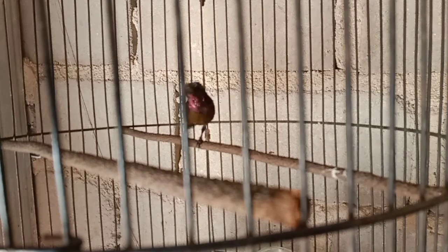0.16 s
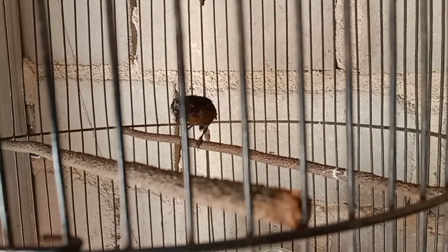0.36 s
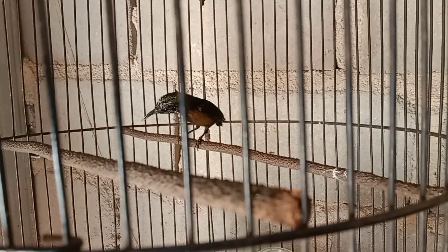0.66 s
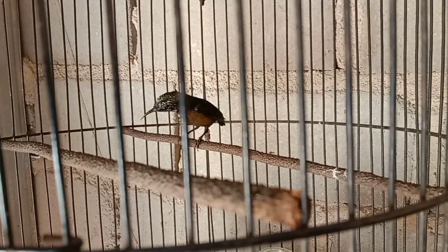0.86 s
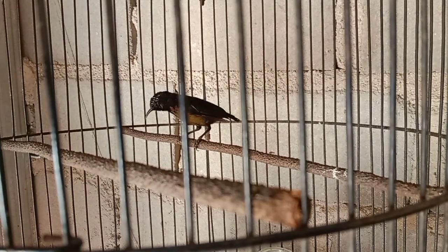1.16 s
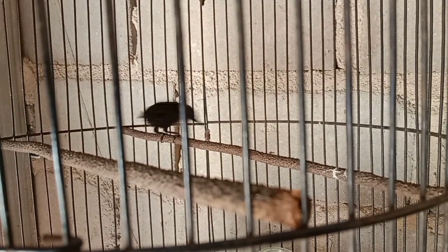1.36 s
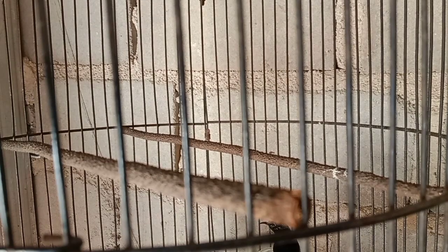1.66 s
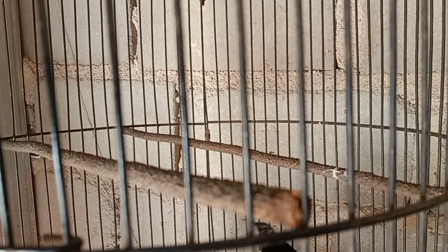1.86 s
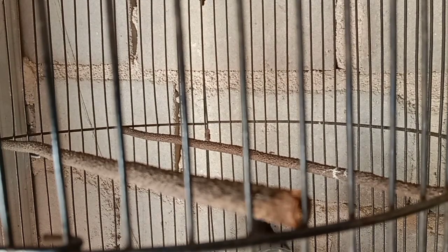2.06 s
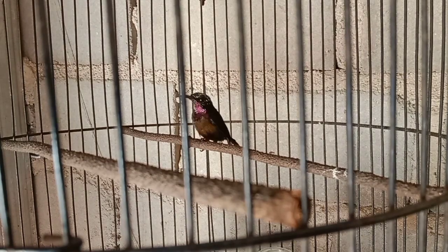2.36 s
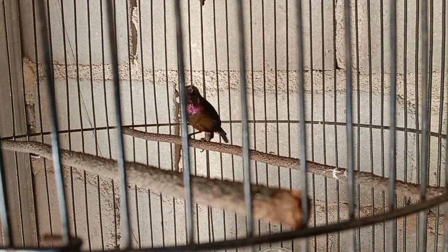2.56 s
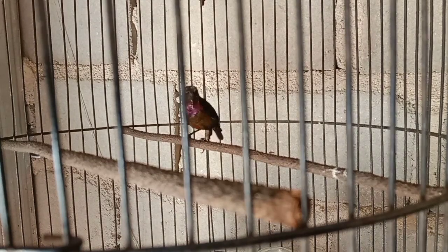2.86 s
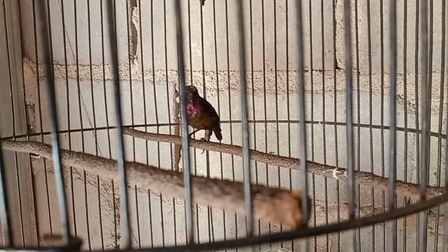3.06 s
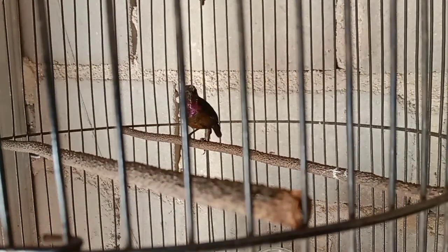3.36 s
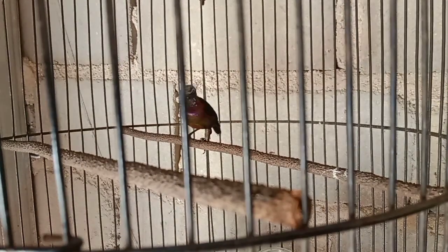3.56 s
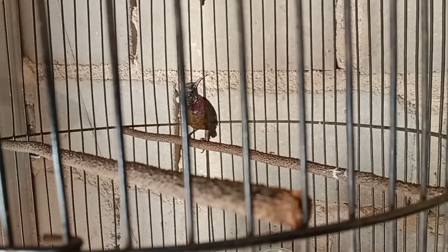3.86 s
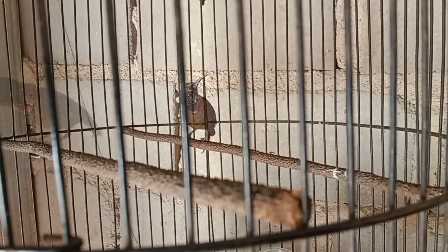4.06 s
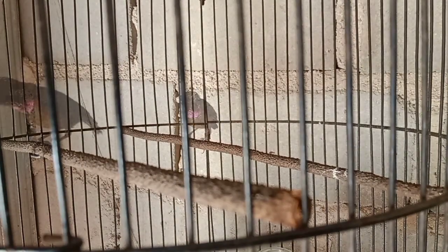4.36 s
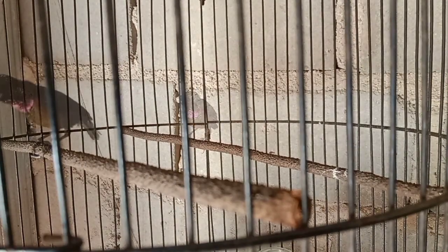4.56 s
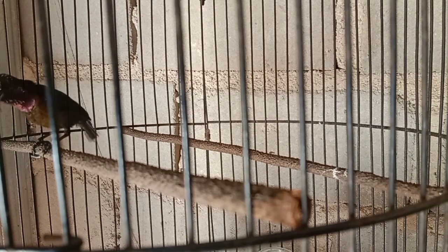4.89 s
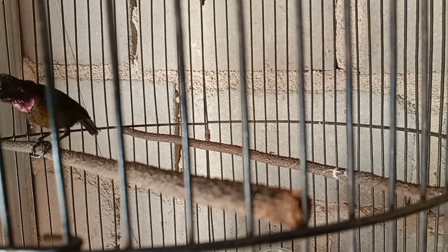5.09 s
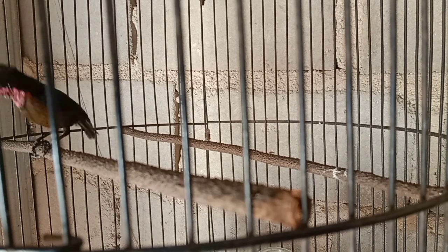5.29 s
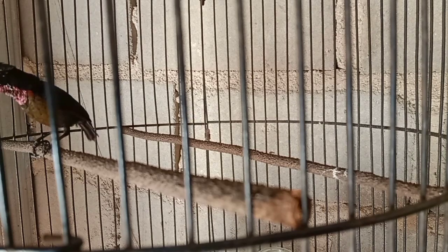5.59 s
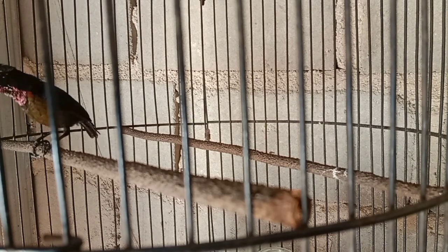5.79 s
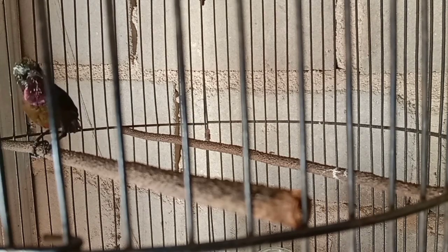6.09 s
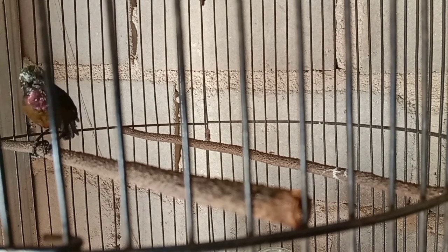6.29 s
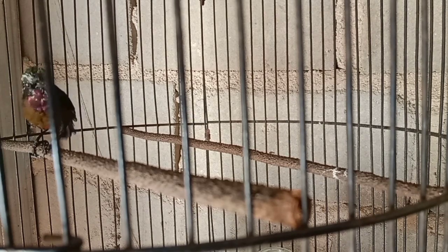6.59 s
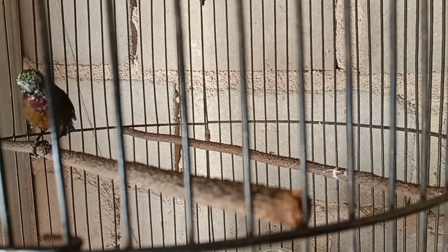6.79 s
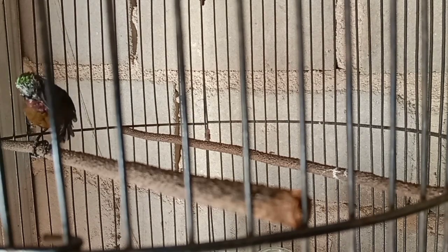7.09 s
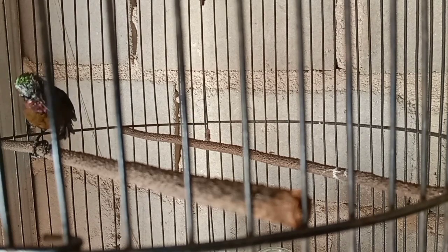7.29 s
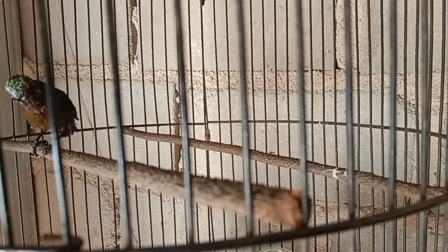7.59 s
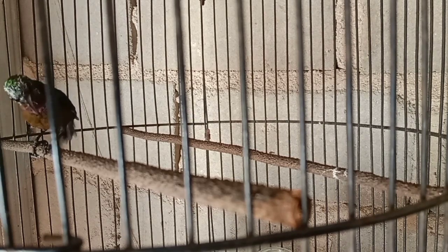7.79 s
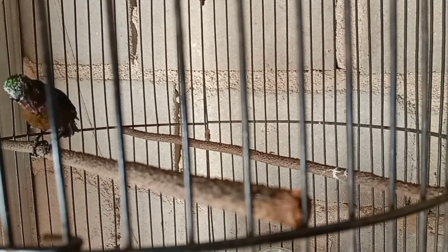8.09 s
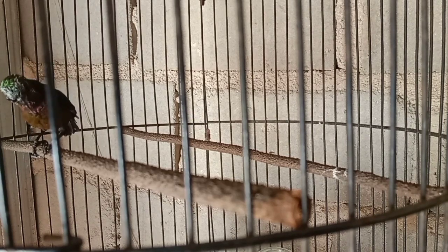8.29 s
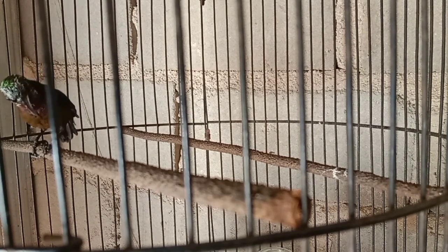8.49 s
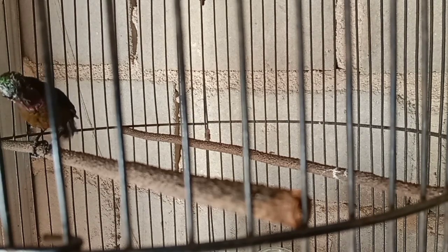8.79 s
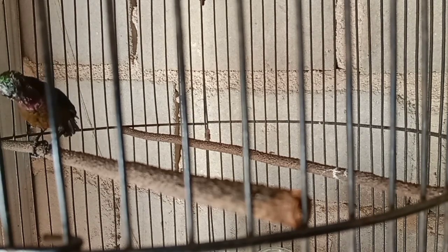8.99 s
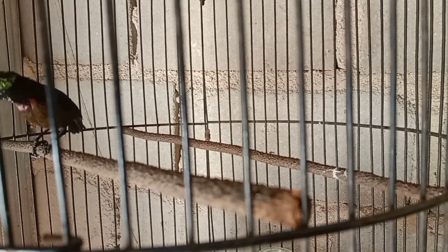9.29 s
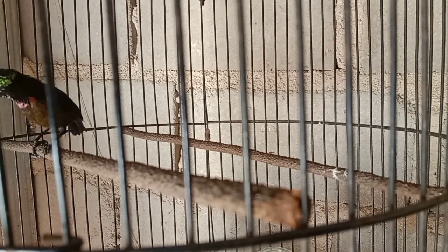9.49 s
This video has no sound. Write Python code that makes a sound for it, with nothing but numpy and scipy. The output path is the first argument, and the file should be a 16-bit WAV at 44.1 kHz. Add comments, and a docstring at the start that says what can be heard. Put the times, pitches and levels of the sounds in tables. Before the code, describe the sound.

Bright sunbird whistles and scratchy chattering burst out with short pauses, among feather flicks and soft wing thumps, above uneven low hum, roar and hiss.

```python
"""A short reedy chirp opens over a motor hum and a distant roar: a caged sunbird before a tiled wall.
Clear whistles (gliding tones with faint overtones), harsh rasps (rough harmonic voices, some overlapping)
and one fast trill (a repeated upstroke) follow, among feather flicks (grainy noise) and soft thumps.
The hum is a set of wavering harmonics in rumble; roar and hiss are patchy noise.
Roar and hiss swell, fade and twice jump back in."""
import sys
import numpy as np
from scipy import signal
from scipy.fft import rfft, irfft, next_fast_len
from scipy.io import wavfile
from scipy.ndimage import uniform_filter1d

SR = 44100
rng = np.random.default_rng(int(sys.argv[2]) if len(sys.argv) > 2 else 0)


def dump(signal):
    """Clip the signal to [-1, 1] and save it as 16-bit WAV at the path in sys.argv[1]."""
    limited = np.clip(np.atleast_2d(signal).T, -1, 1)
    pcm = np.round(limited * 32767).astype(np.int16)
    wavfile.write(sys.argv[1], SR, pcm)


N = 425565
TIME = np.arange(N) / SR


def gain_of(db):
    """Logarithmic level: converts decibels to amplitude."""
    return 10 ** (np.asarray(db) / 20)


def evened(x):
    """Power normalisation: scales a signal to rms 1."""
    return x / np.sqrt(np.mean(x ** 2) + 1e-20)


def read(points, hz):
    """Spectral envelope: levels in dB, joined on a log-frequency axis."""
    f, db = np.transpose(points)
    return np.interp(np.log(hz + 1), np.log(f + 1), db)


def curves(rows, t):
    """Piecewise-linear envelopes: every column of a time table at the times t."""
    s, *columns = np.transpose(rows)
    return [np.interp(t, s, c) for c in columns]


def add(mix, s, sound):
    """Superposition: mixes a sound in at time s."""
    part = mix[max(round(s * SR), 0):][:len(sound)]
    part += sound[:len(part)]


def noise(colour, size):
    """Spectral shaping: white noise filtered to a given spectrum, rms 1."""
    hz = np.fft.rfftfreq(size, 1 / SR)
    spectrum = rfft(rng.standard_normal(size)) * gain_of(read(colour, hz))
    return evened(irfft(spectrum, size))


def wander(rate_hz, size):
    """Low-pass random modulation: smooth chance up to a rate, about rms 1."""
    length = next_fast_len(size + 4096)
    hz = np.fft.rfftfreq(length, 1 / SR)
    spectrum = rfft(rng.standard_normal(length)) / (1 + (hz / rate_hz) ** 4)
    return evened(irfft(spectrum, length))[:size]


def patchy(colour, patch_db, size=14):
    """Nonstationary noise: narrow bands swell and fade on their own."""
    hz, _, z = signal.stft(rng.standard_normal(N), SR, nperseg=2048, noverlap=1536)
    # size counts the time frames averaged: larger patches change more slowly
    patches = uniform_filter1d(rng.standard_normal(z.shape), size=4, axis=0)
    patches = uniform_filter1d(patches, size=size, axis=1)
    z = z * gain_of(read(colour, hz)[:, None] + patch_db * evened(patches))
    return evened(signal.istft(z, SR, nperseg=2048, noverlap=1536)[1][:N])


def hum(lines_db=-1, rumble_db=-4, waver=.008):
    """Rotating machinery: harmonics of a wavering turning rate, in low rumble."""
    # motor speed: (time [s], mean rate [turns/s])
    motor_speed = [(1.8, 46), (4.4, 49.1)]
    # harmonics: (multiple of the turning rate, relative level [dB])
    hum_lines = [(2, -4), (3, 0), (4, -17.5), (5, -9.5)]
    # rumble spectrum: (frequency [Hz], relative level [dB])
    rumble_colour = [(40, -32), (75, -10), (115, -2.5), (170, -1), (250, -14.5), (330, -21), (600, -51)]
    # common envelope of lines and rumble, which sinks away in the lull: (time [s], gain [dB])
    hum_level = [(0, -48.5), (.2, -56), (.27, -41.5), (1.24, -44.5), (1.32, -58), (1.43, -44), (1.8, -41.5),
                 (2.05, -47), (2.28, -71), (4.471, -83), (4.475, -41.5), (5.4, -45), (7.8, -44.5),
                 (8.4, -41.5), (9.65, -43)]
    turns = np.cumsum(curves(motor_speed, TIME)[0] * (1 + waver * wander(7.4, N))) / SR
    lines = sum(gain_of(db + 2 * wander(5, N)) * np.sin(2 * np.pi * k * turns) for k, db in hum_lines)
    rumble = patchy(rumble_colour, patch_db=3.0)
    mixture = gain_of(lines_db) * evened(lines) + gain_of(rumble_db) * rumble
    return gain_of(curves(hum_level, TIME)[0]) * mixture


def whines():
    """Narrow-band noise: slow random amplitudes on steady tones, entering as the hum returns."""
    # faint whines: (frequency [Hz], rms level before the dips [dB])
    whine_lines = [(1567, -76.5), (3898, -78.5), (4334, -81.5)]
    from_s, width_hz = 4.472, 30
    tones = sum(gain_of(db) * evened(wander(width_hz, N) * np.sin(2 * np.pi * hz * TIME))
                for hz, db in whine_lines)
    return tones * (TIME > from_s)


def roar(flutter_db=1.07):
    """Band-wise envelopes: coloured noise jumps in, flutters and fades in three bands."""
    # spectra before and after the change of colour: (frequency [Hz], relative level [dB])
    early_colour = [(140, -32), (230, -5), (315, -6), (423, 0.5), (634, -10), (695, -18.5), (810, -1),
                    (930, -3), (1020, -15), (1280, -10.5), (1470, -20), (1650, -9.5), (1840, -29.5),
                    (2100, -25.5), (2400, -45.5), (3000, -70.5)]
    late_colour = [(140, -23.5), (230, -4), (300, -3.5), (400, -0.5), (600, -6.5), (700, -14.5), (1000, -2),
                   (1170, -7), (1350, -4), (1500, -10.5), (1670, -10.5), (1850, -20), (2100, -23.5),
                   (2400, -41), (3000, -58.5)]
    # low, middle and upper band: (lower edge [Hz], upper edge [Hz])
    band_edges = [(150, 673), (720, 1395), (1480, 4000)]
    # band envelopes: (time [s], low gain [dB], middle gain [dB], upper gain [dB])
    band_levels = [(0, -40, -34.5, -44), (.85, -44.5, -45.5, -64), (1.754, -51.5, -59, -87),
                   (1.758, -41.5, -49, -52.5), (2.05, -48, -56, -54.5), (2.2, -62, -61, -70),
                   (2.6, -57.5, -70, -71.5), (3.2, -69.5, -80.5, -78), (4.471, -76, -91, -82),
                   (4.473, -34.5, -36.5, -48.5), (5.0, -40.5, -37, -48), (5.35, -45, -46, -48.5),
                   (6.0, -47, -50.5, -64), (6.4, -46, -49.5, -58), (7.15, -57, -60, -69),
                   (8.2, -62, -70, -82.5), (8.4, -60, -63.5, -75), (8.799, -67, -75, -82.5),
                   (9.65, -67.5, -74.5, -85.5)]
    change_s = 1.757
    sound = np.where(TIME < change_s, patchy(early_colour, patch_db=3), patchy(late_colour, patch_db=4.5))
    roaring = 0
    for edges, db in zip(band_edges, curves(band_levels, TIME)):
        band_pass = signal.butter(4, edges, "bandpass", fs=SR, output="sos")
        roaring = roaring + gain_of(db) * evened(signal.sosfiltfilt(band_pass, sound))
    return roaring * gain_of(flutter_db * wander(11, N))


def hiss(grain_db=1.5):
    """Amplitude-modulated noise: broad hiss swells over a faint floor, beside a thin sizzle."""
    # swells: (time [s], rise [s], hold [s], peak gain [dB], fade [dB/s])
    swells = [(1.755, 0.0025, 0.27, -48, 53), (2.445, 0.095, 0.086, -74.5, 60),
              (3.761, 0.0096, 0.14, -65.5, 204.5), (4.473, 0.003, 0.47, -45, 36.5),
              (6.289, 0.024, 0.053, -70, 143), (7.116, .008, 0.082, -60.5, 40),
              (8.334, 0.038, 0.12, -52, 112.5), (9.371, 0.04, 0.037, -60, 138)]
    # spectra of hiss and sizzle: (frequency [Hz], relative level [dB])
    hiss_colour = [(500, -30), (1400, -1.5), (4500, -4), (8400, -3.5), (9400, -11), (15500, -20)]
    sizzle_colour = [(3000, -29.5), (4000, -3), (5200, -39.5), (6500, -3), (7600, 8.5), (8900, -3.5),
                     (9500, -33), (15000, -39.5)]
    # weight of the air, the part of the hiss above air_hz: (time [s], gain [dB])
    air_weight = [(1.7, -11.5), (1.76, -10.5), (2.1, -3.5), (2.3, -1.5), (2.58, 5.5), (2.65, 11),
                  (4.3, 4.5), (4.5, -14.5), (5.6, -6.5), (6.2, -8), (6.32, 12), (7.6, 6), (7.9, 4),
                  (8.35, 5)]
    # mean envelope of the treble sizzle: (time [s], gain [dB])
    sizzle_level = [(0, -75), (4.47, -75), (4.48, -54), (5.3, -63), (6.4, -65.5), (7.9, -74), (8.3, -55),
                    (8.9, -64.5), (9.2, -74), (9.45, -60)]
    floor_db, air_hz = -72.5, 9200
    level = gain_of(floor_db)
    for s, rise, hold, db, fade in swells:
        fading_s = np.maximum(TIME - s - rise - hold, 0)
        level = level + np.clip((TIME - s) / rise, 0, 1) * gain_of(db - fade * fading_s)
    sound = patchy(hiss_colour, patch_db=5.0, size=9)
    body = signal.sosfiltfilt(signal.butter(8, air_hz, fs=SR, output="sos"), sound)
    air = (sound - body) * gain_of(curves(air_weight, TIME)[0])
    broad = (body + air) * level * gain_of(wander(30, N) + grain_db * wander(400, N))
    sizzle_db = curves(sizzle_level, TIME)[0] + 2 * wander(15, N)
    return broad + patchy(sizzle_colour, patch_db=3.5) * gain_of(sizzle_db)


def puff(u):
    """Impulsive envelope: a swell to its peak at u = 1/4, then exponential decay."""
    return 4 * u * np.exp(1 - 4 * u)


def thuds():
    """Low-frequency impulses: soft thumps, likely puffs of air from the wings, swell and die."""
    # thumps: (time [s], time scale, half the duration [s], centre [Hz], level [dB], width [octaves])
    thumps = [(1.735, 0.28, 178.6, -36, 0.049), (2.591, 0.15, 430, -43.5, 1.4),
              (2.796, 0.14, 252, -35, 1.2), (3.372, 0.071, 218, -53, 0.19), (3.637, 0.081, 187, -40, 0.23),
              (4.489, 0.079, 251, -28.5, 0.11), (5.98, 0.07, 350, -38.5, 0.62),
              (8.278, 0.1, 129, -37, 0.26), (8.36, 0.14, 190, -44.5, 0.84)]
    out = np.zeros(N)
    bands_hz = np.geomspace(20, 20000, num=200)
    for s, length, hz, db, width in thumps:
        u = np.arange(0, 2, 1 / (length * SR))
        resonance_db = -20 * np.log10(1 + (np.log2(bands_hz / hz) / width) ** 2)
        colour = np.transpose([bands_hz, resonance_db - (bands_hz / 1000) ** 2])
        add(out, s, gain_of(db) * noise(colour, len(u)) * puff(u))
    return out


def flicks(grain_db=3, knee_hz=6000):
    """Friction noise: feathers brush in short grainy swishes; a whole wing adds the lower part."""
    # flicks: (time [s], time scale, half the duration [s], level [dB], weight of the low swish [dB])
    swishes = [(0.252, 0.056, -55.5, -21), (0.332, 0.05, -57.5, -23), (0.414, 0.038, -54, -22),
               (0.515, 0.041, -49.5, -28), (0.617, 0.037, -48.5, -18), (2.597, 0.092, -38.5, -10.5),
               (2.804, 0.16, -48, -14), (3.807, 0.045, -53, 0), (3.837, 0.058, -46.5, -5.5),
               (3.936, 0.012, -54.5, -3), (5.993, 0.05, -61.5, -3), (6.487, 0.015, -38, -23.5),
               (7.294, 0.032, -39.5, -10), (7.311, 0.014, -30.5, -10), (7.378, 0.023, -33, -15),
               (7.397, 0.015, -35.5, -15), (7.403, 0.016, -38, -4), (7.47, 0.087, -49.5, -16)]
    # feather spectrum: (frequency [Hz], relative level before the low weight [dB])
    feather_colour = [(300, -20), (1200, 1), (2500, 7), (4500, 11.5), (7500, 4), (8800, -6), (9800, -17.5),
                      (15000, -31)]
    out = np.zeros(N)
    for s, length, db, low_db in swishes:
        u = np.arange(0, 2, 1 / (length * SR))
        colour = [(hz, level + low_db * (hz < knee_hz)) for hz, level in feather_colour]
        swish = evened(noise(colour, len(u)) * gain_of(grain_db * wander(590, len(u))))
        add(out, s, gain_of(db) * swish * puff(u))
    return out


def syrinx(hz, jitter):
    """Frequency modulation: phase of a membrane whose pitch glides and trembles."""
    pitch = uniform_filter1d(hz, size=110, mode="nearest") * (1 + jitter)
    return 2 * np.pi * np.cumsum(pitch) / SR, pitch


def gate(t, edge_s=0.0015):
    """Smooth onset and offset: the air valve opens and shuts softly."""
    edge = np.clip(np.minimum(t - t[0], t[-1] - t) / edge_s, 0, 1)
    return np.sin(np.pi / 2 * edge) ** 2


def sag(t):
    """Pressure-dependent pitch: a factor that droops as the note's air is cut off."""
    cut_s, cut_share = 0.0021, 0.054
    return 1 - cut_share * np.exp((t - t[-1]) / cut_s)


def arch(u, peak, onset_db, end_db):
    """Level envelope in dB over a note (u from 0 to 1): it swells to its peak and eases off."""
    peak = np.clip(peak, .05, .95)
    swell_db = onset_db * abs(1 - u / peak) ** 1.5
    ease_db = end_db * abs((u - peak) / (1 - peak)) ** 1.5
    return np.where(u < peak, swell_db, ease_db)


def rasps(jitter=0.12, slope_db=-7, shimmer=1.0, doubling=1.3):
    """Source and filter: chaotic vibration smears harmonics under the throat's peak near 7.5 kHz."""
    # one row a voice; the two sides of the syrinx may overlap:
    # (time [s], length [s], start pitch [Hz], end pitch [Hz], lateness of the sweep [1 = even],
    #  relative level [dB], loudest at [share of length], roughness at the start [0-1])
    sweeps = [(2.64, 0.039, 3520, 4555, 0.36, -25, 0.28, 0.29),
              (2.647, 0.028, 4900, 5740, 0.31, -23, 0.55, 0.049),
              (2.783, 0.036, 2530, 6690, 2.5, -25, 0.69, 0.41),
              (2.797, 0.033, 2800, 6500, 1.7, -19, 0.98, 0.35),
              (2.963, 0.041, 3410, 6570, 1.42, -28.5, 0.3, 0.48),
              (2.97, 0.024, 4110, 8140, 0.76, -22, 0.75, .08),
              (3.074, 0.023, 3380, 2230, 3.2, -30, .8, 0.088),
              (3.095, 0.016, 2186, 2590, 1, -27, 0.34, 0.76),
              (3.103, 0.013, 2880, 4030, 0.7, -22, .5, 0.17),
              (3.161, .013, 1985, 2710, 0.89, -26.5, 0.49, 0.87),
              (3.263, 0.022, 2350, 4340, 0.73, -24, 0.66, 0.1),
              (3.336, 0.022, 2234, 2335, 0.89, -27.5, 0.86, 1),
              (3.353, 0.013, 2130, 3320, 0.99, -34.5, 0.36, .3),
              (3.446, 0.022, 2450, 4750, 0.61, -27.5, 0.42, 0.12),
              (3.508, 0.026, 2220, 2240, 1.1, -31.5, .7, 0.87),
              (3.523, 0.012, 2130, 3440, 0.68, -24.5, 1, .08),
              (3.6, 0.018, 2660, 1870, 2.1, -32.5, 0.63, 0.17),
              (3.664, 0.01, 2580, 4270, 0.6, -24.5, 0.39, 0.16),
              (4.5, 0.027, 4330, 6320, 0.84, -22, 0.56, .15),
              (4.5, 0.042, 3546, 6760, 3.2, -15.5, 0.45, 0.31),
              (4.504, .045, 3270, 6900, 2.2, -16.5, 1, .2),
              (4.643, 0.045, 2750, 6940, 1.72, -19, 0.78, 0.36),
              (4.647, 0.028, 4470, 7980, 1.4, -19, 0.551, 0.2),
              (4.650, 0.039, 3096, 6850, 2.2, -16, 1, 0.54),
              (4.786, 0.014, 2560, 4580, 1.4, -25.5, 0.72, 0.44),
              (5.11, 0.013, 3500, 3910, 1.3, -28.5, 0.64, 0.74),
              (8.725, 0.016, 3580, 4580, 1.74, -38.5, 1, 0.45)]
    # throat resonance: (frequency [Hz], relative level [dB])
    throat_colour = [(1500, -44), (2500, -4.5), (3300, -5), (4200, 0.5), (5500, 3.5), (7500, 8),
                     (8800, -0.5), (9600, -9), (12000, -15), (15500, -20.5)]
    onset_db, end_db, clearing = -15.5, -10, 0.66  # clearing: share of roughness lost on the way
    out = np.zeros(N)
    k = np.arange(2, 11)[:, None] / 2  # harmonics 1 to 5 and the lines halfway between
    for s, length, start_hz, end_hz, lateness, level_db, peak, roughness in sweeps:
        t = np.arange(0, length, 1 / SR)
        u = t / length
        hz = start_hz + (end_hz - start_hz) * np.sin(np.pi / 2 * u ** lateness) ** 2
        db = level_db + arch(u, peak, onset_db, end_db)
        rough = roughness * (1 - clearing * u)
        phase, _ = syrinx(hz, jitter * rough * wander(1600, len(t)))
        tilt_db = slope_db * np.maximum(k - 2, 0) * (1 - rough)
        weight = gain_of(read(throat_colour, k * hz) + tilt_db) * (k * hz < SR / 2)
        # strong and weak cycles alternate in a rough voice, adding the halfway lines
        weight = weight * np.where(k % 1 > 0, np.clip(doubling * rough, 0, 1), 1)
        voice = (weight * np.sin(k * phase)).sum(0) / np.linalg.norm(weight, axis=0)
        unsteady = 1 + shimmer * rough * wander(900, len(t))
        add(out, s, voice * unsteady * gain_of(db) * gate(t))
    return out


def clear_note(t, hz, db, bright_db=0, tremble=0.0072, flutter_db=1.68, strain=0.046):
    """Harmonic series: a nearly pure tone, made unsteady by a fast upward glide."""
    # overtone levels, from the fundamental up [dB]
    overtones_db = (-3.5, -29.5, -38)
    # the beak passes little of the highest overtones: (frequency [Hz], gain [dB])
    beak_colour = [(9000, -2.5), (12300, -5.5), (13300, -9), (14200, -26), (15500, -21.5)]
    climb = np.clip(np.gradient(np.log(hz)) * SR / 30, 0, 1)
    phase, pitch = syrinx(hz, (tremble + strain * climb) * wander(620, len(t)))
    tone = 0
    for k, level in enumerate(overtones_db, 1):
        weight = gain_of(level + bright_db * (k > 1) + read(beak_colour, k * pitch))
        tone = tone + weight * np.sin(k * phase) * (k * pitch < SR / 2)
    return tone * gain_of(db + flutter_db * wander(200, len(t))) * gate(t)


def trill(reedy_db=14):
    """Rapid frequency modulation: one quick upstroke repeated, with a reedy low start."""
    # chips: (time [s], length [s], top pitch [Hz], end pitch [Hz], relative level [dB])
    chips = [(4.792, 0.03, 7750, 10200, -9.5), (4.847, 0.02, 7970, 7570, -4),
             (4.9, 0.025, 7670, 8900, -10.5), (4.938, 0.03, 7510, 7150, -6),
             (4.989, 0.027, 7800, 8000, -18.5), (5.026, 0.029, 7810, 7270, -7.5),
             (5.076, 0.021, 7620, 7300, -12), (5.116, 0.026, 7870, 7900, -9),
             (5.170, 0.027, 7600, 5940, -14.5), (5.198, .02, 7730, 7700, -4.5)]
    # upstroke of every chip: (time from its start [s], share of the top pitch, relative level [dB])
    upstroke = [(0, .45, -23), (.003, .65, -17), (.0065, .86, -5.5), (.0098, .955, 5), (.0135, 1, -1),
                (.024, .99, -2)]
    hook_s, hook_db = 0.012, -13.5  # a chip hooks to its end pitch, fading as it goes
    out = np.zeros(N)
    for s, length, top_hz, end_hz, level_db in chips:
        t = np.arange(upstroke[0][0], length, 1 / SR)
        share, db = curves(upstroke, t)
        hook = np.clip(1 - (length - t) / hook_s, 0, 1)
        hz = top_hz * share + (end_hz - top_hz * share) * hook ** 2
        chip = clear_note(t, hz, level_db + db + hook_db * hook,
                          bright_db=2 * reedy_db * (1 - share), tremble=.004, strain=.008)
        add(out, s + t[0], chip)
    return out


def upslurs():
    """Resonance: the pitch climbs, rings out where it meets the throat's resonance, then droops."""
    # rising notes: (time [s], length [s], start pitch [Hz], top pitch [Hz], level before the ring [dB],
    #  swell peaks at [share of length])
    rising_notes = [(5.548, 0.05, 3420, 4380, -17, 0.5), (6.232, 0.044, 3570, 4440, -21.5, 0.52),
                    (6.883, 0.054, 3360, 4194, -19, 0.67), (7.707, 0.044, 3630, 4526, -19.5, 0.86),
                    (8.427, 0.05, 3580, 4410, -24, 0.18), (9.089, 0.04, 3210, 4457, -16, 0.99)]
    crest, swell_db, ease_db = 0.86, -22.5, -6  # tops out at this share; level at start and end
    ring_hz, ring_width_hz, ring_peak_db = 4410, 190, 5.5
    out = np.zeros(N)
    for s, length, start_hz, top_hz, db, peak in rising_notes:
        t = np.arange(0, length, 1 / SR)
        climb = np.sin(np.pi / 2 * t / length / crest)
        hz = (start_hz + (top_hz - start_hz) * climb) * sag(t)
        ring_db = ring_peak_db / (1 + ((hz - ring_hz) / ring_width_hz) ** 2)
        level = db + ring_db + arch(t / length, peak, swell_db, ease_db)
        add(out, s, clear_note(t, hz, level, tremble=0.004, strain=.008))
    return out


def downslurs():
    """Coupled pitch and level: a thin high start dives, gains strength, catches and rebounds."""
    # falling notes: (time [s], length [s], wait before the dive [s], start pitch [Hz],
    #  bottom pitch [Hz], end pitch [Hz], relative level [dB], change of level at the bottom [dB])
    falling_notes = [(5.744, 0.038, 0.002, 9570, 7350, 7420, -12, -4),
                     (5.864, 0.054, 0.012, 9020, 6780, 7470, -13.5, -4),
                     (7.966, 0.035, 0.00016, 9380, 7280, 7380, -12.5, -3),
                     (8.105, 0.057, 0.011, 9080, 7430, 7770, -10.5, 2),
                     (9.486, 0.043, 0.003, 9570, 6230, 7440, -12, -21)]
    dive_s, thin_db = .018, -28.5  # length of the dive; relative level at the thin start
    catch_s = 0.0045  # the voice catches this long around the bottom
    out = np.zeros(N)
    for s, length, wait, start_hz, bottom_hz, end_hz, db, catch_db in falling_notes:
        t = np.arange(0, length, 1 / SR)
        bottom_s = wait + dive_s
        dive = np.clip((t - wait) / dive_s, 0, 1)
        rebound = np.sin(np.pi / 2 * np.clip((t - bottom_s) / (length - bottom_s), 0, 1))
        hz = start_hz + (bottom_hz - start_hz) * dive + (end_hz - bottom_hz) * rebound
        caught_db = catch_db * np.exp(-((t - bottom_s) / catch_s) ** 2)
        level = db + arch(t / length, bottom_s / length, thin_db, 0) + caught_db
        add(out, s, clear_note(t, hz, level, bright_db=-8, tremble=0.0012))
    return out


def held_notes():
    """Vibrato: an accented scoop up to a held pitch that wavers periodically."""
    # level whistles: (time [s], length [s], scoop's start pitch [Hz], held pitch [Hz],
    #  vibrato depth [Hz], relative level [dB])
    level_whistles = [(6.485, .143, 5750, 6067, 190, -16.5), (8.734, 0.098, 4400, 6010, 7.4, -10)]
    accent_db, accent_s, vibrato_hz = 4, 0.014, 11.5
    scoop_s, scoop_db_per_hz = 0.007, .003  # weaker while under its pitch
    out = np.zeros(N)
    for s, length, start_hz, held_hz, depth_hz, db in level_whistles:
        t = np.arange(0, length, 1 / SR)
        under_hz = (held_hz - start_hz) * np.exp(-(t / scoop_s) ** 2)
        vibrato = depth_hz * np.cos(2 * np.pi * vibrato_hz * t)
        hz = (held_hz - under_hz - vibrato) * sag(t)
        level = db + accent_db * np.exp(-t / accent_s) - scoop_db_per_hz * under_hz
        add(out, s, clear_note(t, hz, level, bright_db=-3.0, tremble=0.003))
    return out


def slurred(contour, bright_db):
    """Continuous glide: one note that follows its own contour of pitch and level."""
    out = np.zeros(N)
    t = np.arange(contour[0][0], contour[-1][0], 1 / SR)
    add(out, t[0], clear_note(t, *curves(contour, t), bright_db=bright_db))
    return out


def warbles():
    """Pitch contours: the chirp is reedy by strong overtones; the swoops leap, dive and climb again."""
    # opening chirp: (time [s], pitch [Hz], relative level [dB])
    chirp_contour = [(0, 3800, -28.5), (.007, 4740, -23.5), (.015, 4430, -16.5), (.02, 3800, -14),
                     (.027, 3750, -13.5), (.034, 4310, -12.5), (.045, 3770, -34)]
    # one list a swoop: (time [s], pitch [Hz], relative level [dB])
    swoop_contours = [
        [(.864, 3760, -27.5), (.874, 7930, -22.5), (.902, 7180, -14.5), (.917, 4720, -27.5),
         (.934, 4320, -11.5), (.948, 4420, -23), (.954, 5360, -12.5), (.97, 5640, -16), (.995, 6180, -26)],
        [(1.172, 4610, -25), (1.186, 8100, -18.5), (1.198, 7550, -10.5), (1.209, 7140, -15),
         (1.222, 4670, -30.5), (1.26, 3850, -22.5), (1.274, 4260, -21.5), (1.287, 5680, -13),
         (1.322, 6540, -20.5)],
    ]
    swoops = sum(slurred(contour, bright_db=0.5) for contour in swoop_contours)
    return slurred(chirp_contour, bright_db=11.5) + swoops


def room(x, scatter_db=-12, tail_db=-10.0, tail_t60=0.24):
    """Impulse response: hard echoes, a quick scatter from the wall corner and a duller tail."""
    # reflections from cage tray and wall: (delay [s], level [dB])
    reflections = [(.0013, -23), (.0029, -19.5), (.0047, -10), (.0078, -14.5)]
    t = np.arange(SR * 3 // 4) / SR
    scatter = rng.standard_normal(len(t)) * gain_of(-60 * t / .09) * (t > .002)
    tail = noise([(4000, 0.5), (7500, 0), (13000, -3.5)], len(t))  # (frequency [Hz], level [dB])
    tail = tail * gain_of(-60 * t / tail_t60) * (t > .006)
    response = gain_of(scatter_db) * scatter / np.linalg.norm(scatter)
    response = response + gain_of(tail_db) * tail / np.linalg.norm(tail)
    for delay, db in reflections:
        add(response, delay, gain_of([db]))
    return x + signal.fftconvolve(x, response)[:N]


def scene(whistle_db=0, trill_db=0, rasp_db=-1):
    """Superposition: the bird in its corner over hum, roar, whines and hiss, with a few hushes."""
    # all sound drops away between rasps: (from [s], to [s], depth [dB])
    hushes = [(3.195, 3.256, -12), (3.403, 3.437, -10), (3.709, 3.77, -11.5), (3.989, 4.465, -10.5)]
    # the background dips briefly: (time [s], half-width [s], depth before weighting [dB])
    dips = [(1.64, .035, -6), (6.865, 0.017, -7.5), (7.08, 0.021, -1), (7.7, 0.017, -11.5),
            (7.91, 0.056, -12.5), (9.257, 0.039, -10.5)]
    whistles = warbles() + upslurs() + downslurs() + held_notes()
    voice = gain_of(whistle_db) * whistles + gain_of(trill_db) * trill() + gain_of(rasp_db) * rasps()
    hush_db = sum(1.0 * db * (TIME > start) * (TIME < end) for start, end, db in hushes)
    hush_db = uniform_filter1d(hush_db, size=300)
    dip_db = sum(db * np.exp(-((TIME - s) / width) ** 2) for s, width, db in dips)
    # the hiss dips less than the rest
    background = (hum() + roar() + whines()) * gain_of(1.02 * dip_db) + hiss() * gain_of(0.26 * dip_db)
    return ((room(voice + flicks()) + thuds() + background) * gain_of(hush_db))[None]


def suppress(x, threshold_db=-86, slope=0.88):
    """Downward expansion: a noise suppressor turns down bands already faint, cutting tails short."""
    z = signal.stft(x, SR, nperseg=512, noverlap=384)[2]
    power = uniform_filter1d(uniform_filter1d(abs(z) ** 2, size=5, axis=-2), size=5, axis=-1)
    under_db = threshold_db - 10 * np.log10(abs(power) + 1e-16)
    cut_db = np.clip(slope * under_db, 0, 14)
    return signal.istft(z * gain_of(-cut_db), SR, nperseg=512, noverlap=384)[1][:, :N]


def record(dry):
    """Linear-phase filtering: noise suppression, then the recorder's band limit."""
    edge_hz = 15750
    band_limit = signal.firwin(511, edge_hz, window=("kaiser", 9), fs=SR)
    return signal.oaconvolve(suppress(dry), band_limit[None], "same")


dry = scene()
out = record(dry)
dump(out)
```